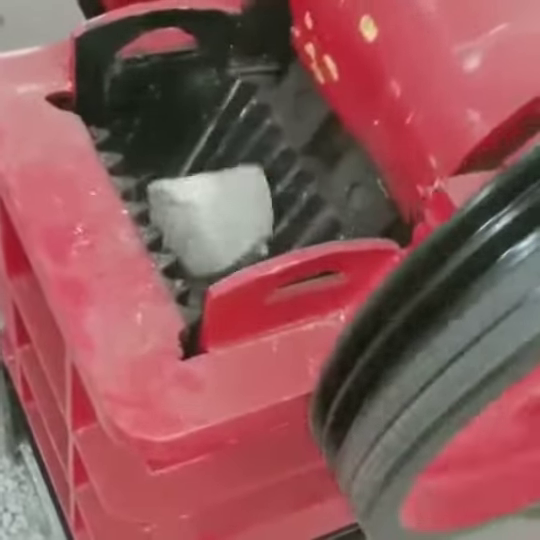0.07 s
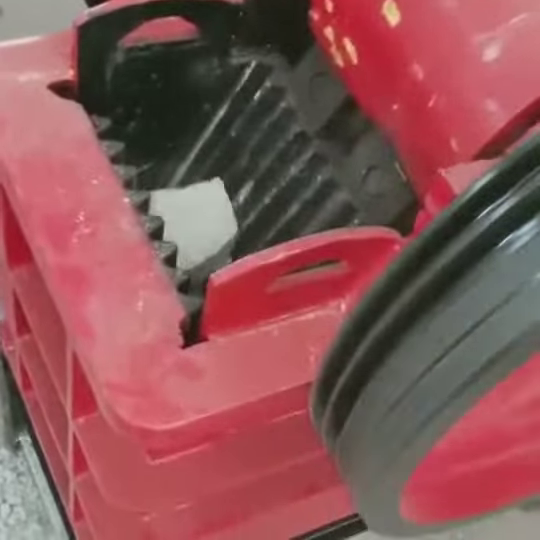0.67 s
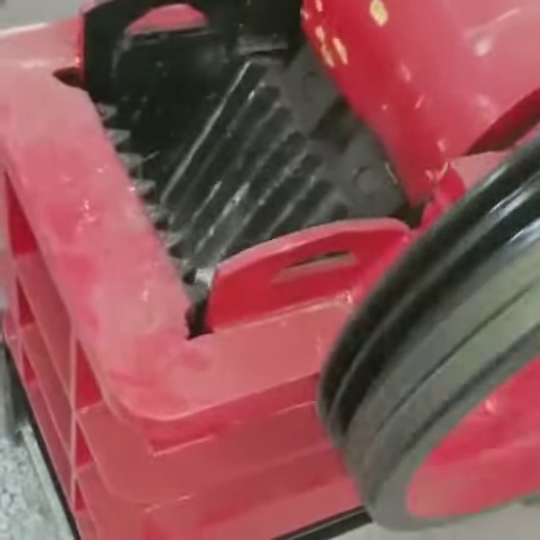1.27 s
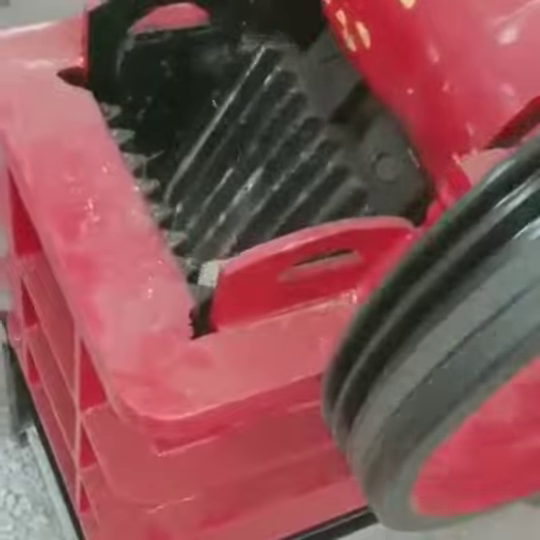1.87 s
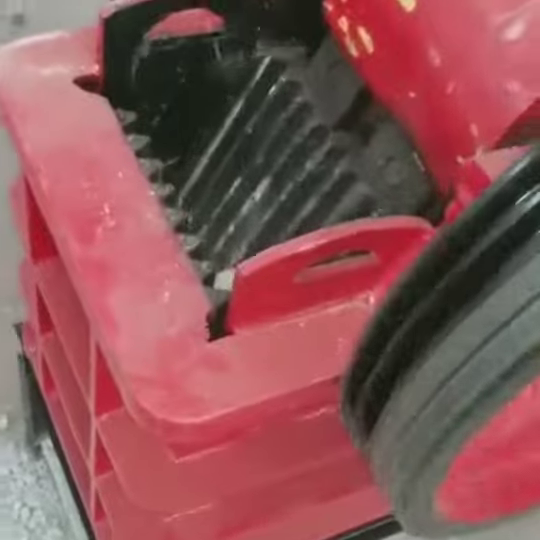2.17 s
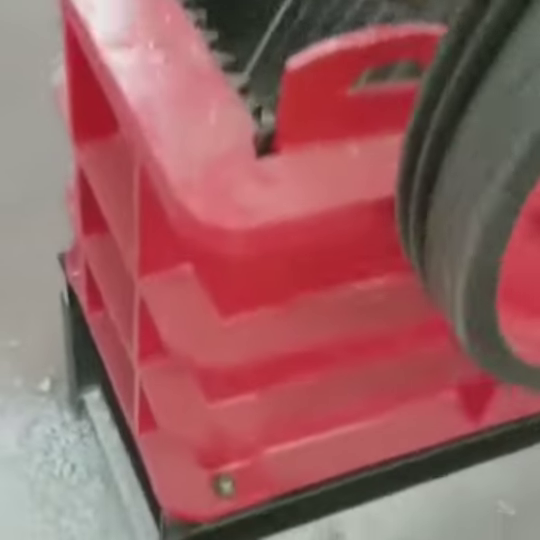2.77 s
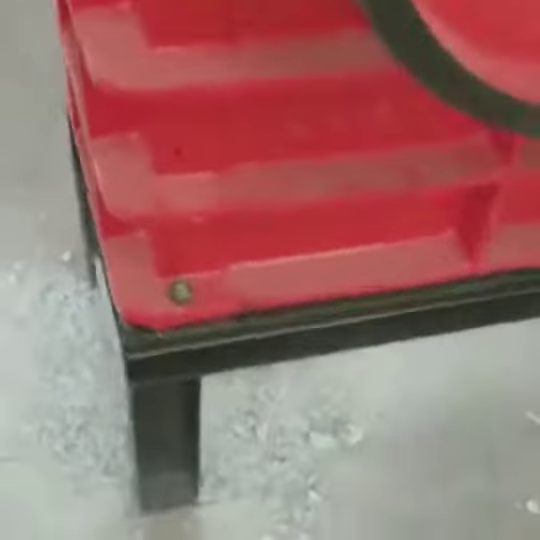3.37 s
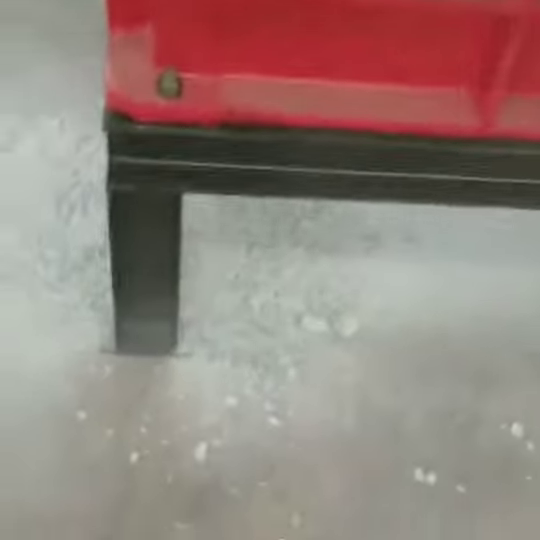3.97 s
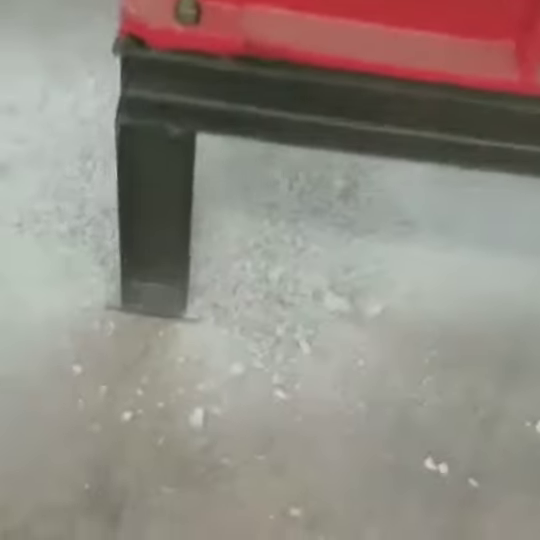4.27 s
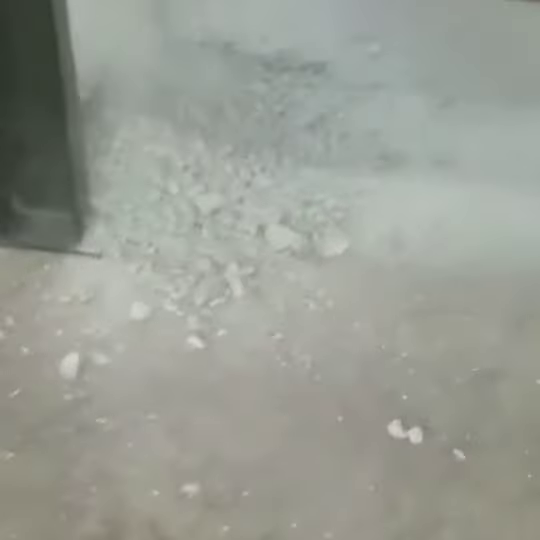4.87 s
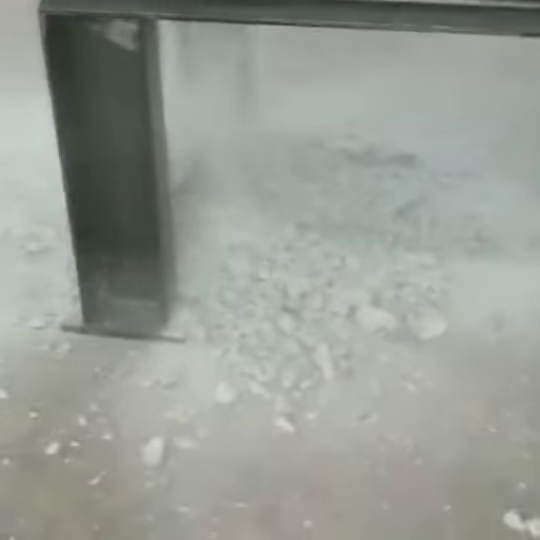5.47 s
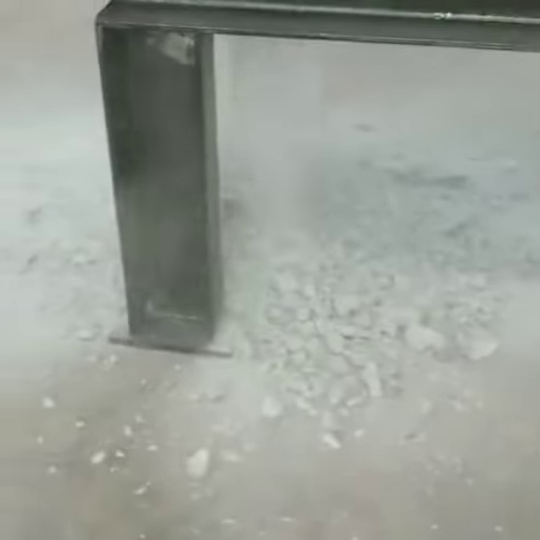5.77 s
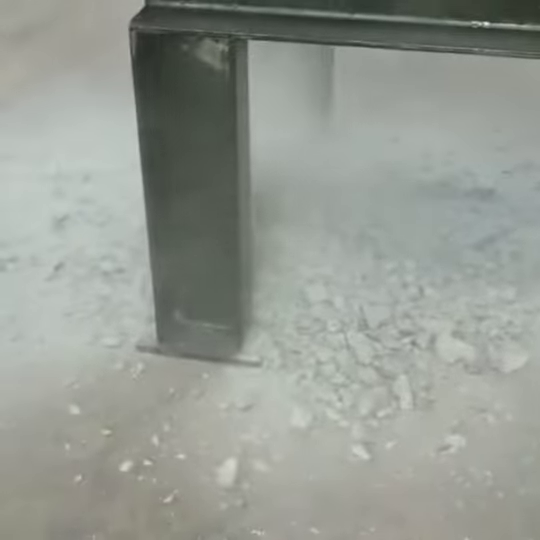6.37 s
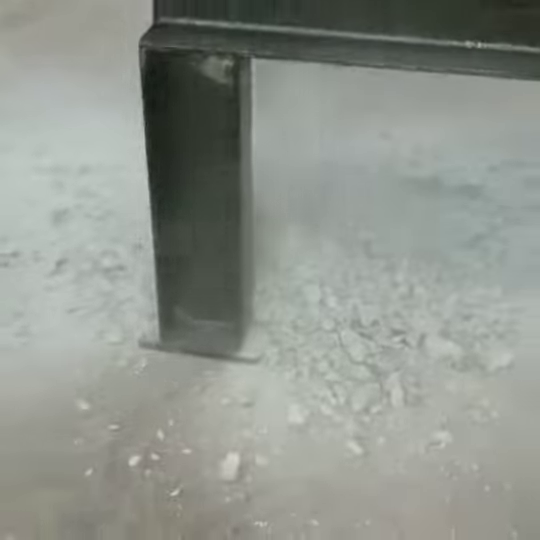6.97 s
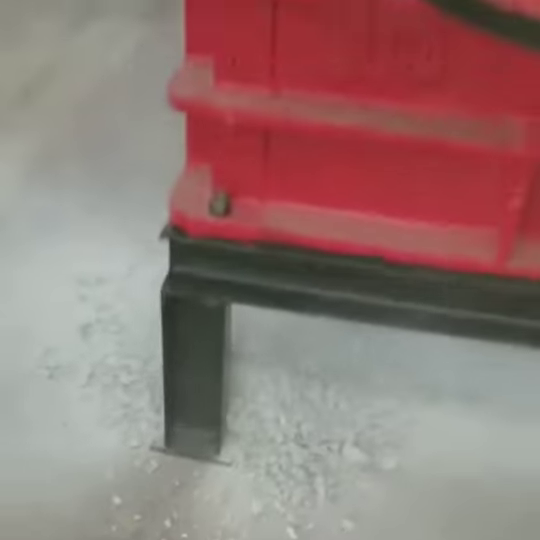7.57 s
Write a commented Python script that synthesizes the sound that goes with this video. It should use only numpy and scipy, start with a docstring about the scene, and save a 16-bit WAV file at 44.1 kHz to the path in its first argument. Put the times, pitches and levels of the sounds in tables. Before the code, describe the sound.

A small jaw crusher breaks stone for the whole seven and a half seconds, close by, in a workshop hall with a light echo. It crunches evenly about four times a second, each stroke a dense swarm of cracks that rings the steel frame. Between strokes, chips rattle down and the drive rumbles. For the first 2.5 seconds the sound comes from the mouth: lumps snap, knock on the teeth and make hollow booms, strongest around 0.4, 0.9 and 2.3 seconds. From about 2.5 to 5 seconds the microphone sinks toward the outlet, and the crunching turns brighter and more metallic as the booms thin out. Sharp cracks and plate clanks cluster around 3.2 to 4.4 seconds and again at 5.2 to 5.6. After slightly lighter crushing, more hard snaps and clanks come from 7 seconds, with the machine still running.

```python
"""Jaw crusher in a workshop hall.

A small crusher breaks stone at about 4.25 strokes/s. Each stroke is a swarm of cracks that rings the
steel frame. Big lumps snap, knock on the jaw teeth, clank on the plates and make the chamber boom.
Between strokes chips rattle down and the drive rumbles. The microphone sinks from mouth to outlet."""
import sys
import numpy as np
from scipy import signal
from scipy.fft import rfft, irfft, next_fast_len
from scipy.io import wavfile

SR = 44100
rng = np.random.default_rng(int(sys.argv[2]) if len(sys.argv) > 2 else 0)


def waveform_to_disk(signal):
    """Save audio, clipped to [-1, 1], as 16-bit WAV at the path in sys.argv[1]."""
    frames = np.transpose(np.atleast_2d(signal))
    scaled = np.clip(frames, -1, 1) * 32767
    samples = np.round(scaled).astype(np.int16)
    wavfile.write(sys.argv[1], SR, samples)


N = 336483
TIME_S = np.arange(N) / SR
STROKE_S, FIRST_CLOSED_S = 0.236, 0.19  # the eccentric shaft closes the jaw once a turn

# Jaw grips stone: grip_s, bite_db, crest_db, low_mid_db
JAW_STROKES = [(0.135, -20.5, -20.5, 0.5), (0.379, -24, -21, 3), (.595, -34, -22, 4), (0.83, -26, -21, -1),
               (1.07, -24.5, -23.5, 4), (1.323, -22.5, -20, -0.5), (1.548, -25, -21, 2.5),
               (1.77, -29.5, -21.5, 2.5), (2.009, -27.5, -20, -4.5), (2.256, -28, -22, 9),
               (2.484, -28, -19.5, -4.5), (2.725, -22, -22, -3.5), (2.979, -25.5, -21.5, -2.5),
               (3.195, -24.5, -22, -3), (3.439, -25, -20, 2), (3.669, -23, -20, -5), (3.9, -22, -16.5, -1),
               (4.139, -23.5, -19.5, 1), (4.366, -31, -21, 4.5), (4.624, -20, -21, 1.5),
               (4.836, -22.5, -22.5, -2), (5.082, -27.5, -22.5, 4), (5.31, -22, -20, -1.5),
               (5.545, -26, -19.5, 3), (5.781, -22, -18, -1), (6.022, -27, -19, 3), (6.273, -28.5, -22, -1),
               (6.496, -23.5, -19, -5), (6.733, -18.5, -18, -6.5), (6.969, -22, -18, 0),
               (7.21, -26, -17, 1.5), (7.439, -27, -21, 3.5)]
# Lump splits and crumbles: start_s, crumble_db, crack_db
LUMP_SPLITS = [(.215, -19, -4), (0.38, -10.5, -26), (.409, -18, -12), (0.458, -15, -13), (.68, -13, -13),
               (.894, -27, -7), (0.904, -18.5, -9), (0.912, -18.5, -1), (1.334, -29, -8),
               (1.369, -18.5, -9), (1.609, -12, -16), (1.859, -19, -12), (2.098, -14.5, -7),
               (2.272, -25, -2.5), (2.331, -16.5, -5), (2.484, -11.5, -17), (2.572, -22, 0.5),
               (3.192, -20, -13), (3.255, -13, -16), (3.691, -28, -12), (3.742, -11.5, -2),
               (3.899, -27.5, -1), (3.953, -17, -9), (3.985, -18, -7), (3.993, -12.5, -8),
               (4.204, -11, -20), (4.424, -26, 0), (4.435, -21, -9), (5.156, -10.5, -19), (5.181, -22, -12),
               (5.322, -20, -4), (5.384, -11, -9), (6.034, -17.5, -18.5), (6.322, -18, -17),
               (6.784, -29, -16), (6.918, -19.5, -18), (7.03, -31, -4), (7.235, -30, -17), (7.292, -10, -8),
               (7.46, -27, 0), (7.5, -22, -5)]
# Lump thumps the jaw plate; stone in the chamber shifts its pitch: start_s, boom_db, pitch_hz
JAW_THUMPS = [(0.209, -16.5, 332), (.4, -15.5, 373), (0.428, -16, 347), (0.449, -15, 324), (.655, -25, 326),
              (0.691, -14, 341), (.893, -17, 323.5), (.911, -9.5, 320), (1.211, -26, 332),
              (1.312, -25, 334), (1.387, -13, 322.5), (1.604, -17.5, 330), (1.862, -17, 322.4),
              (2.093, -17.5, 337), (2.286, -21, 328), (2.325, -11.5, 324), (2.487, -16.5, 322),
              (2.54, -17, 300), (2.753, -17, 295.5), (3.234, -14.5, 330), (3.439, -22, 346),
              (3.661, -21.5, 330), (3.947, -25, 340), (4.162, -20, 340), (4.413, -16, 322),
              (6.995, -26, 336), (7.033, -34, 334)]
# Stone strikes a steel plate: start_s, favoured_hz, level_db
PLATE_HITS = [(0.412, 1620, -4), (.458, 860, -12), (3.229, 236, -10.5), (3.25, 830, -9.5),
              (3.486, 828, -9.5), (3.7, 830, -11), (3.51, 234, -10.5), (3.935, 513, -24), (3.952, 598, -17),
              (3.976, 237, -5.5), (3.992, 1309, -1), (4.415, 252, -12), (5.152, 510, -13),
              (5.169, 1330, -13.5), (5.375, 510, -8.5), (5.605, 239.4, -7), (5.612, 1330, -14),
              (5.835, 510, -14), (6.082, 1330, -24), (6.737, 2100, -20), (7.237, 1247, -9.5),
              (7.275, 232, -1.5), (7.48, 1245, -17.5)]
# Hard lump knocks on the teeth: start_s, pitch_hz, level_db
TOOTH_HITS = [(0.159, 2800, -22), (0.211, 1600, -23), (0.423, 2740, -18), (.422, 4600, -17),
              (0.454, 1560, -18.5), (0.89, 2870, -27), (0.909, 3050, -19), (1.081, 2720, -20),
              (1.364, 1123, -15.5), (1.367, 3090, -22.5), (1.372, 5750, -22.5), (1.564, 2860, -21.5),
              (1.606, 1796, -18), (2.057, 2910, -21.5), (2.295, 676, -20), (2.306, 978, -14),
              (2.328, 1287, -15.5), (2.753, 3270, -16.5), (3.056, 2350, -21.5), (3.262, 984, -20.5),
              (3.495, 1780, -25), (3.494, 370, -23), (3.5, 1007, -20.5), (3.689, 4480, -16),
              (3.708, 3470, -20), (3.744, 4050, -18), (3.957, 3290, -11.5), (4.158, 3340, -14),
              (4.202, 1600, -19.5), (4.367, 4390, -25.5), (4.672, 3170, -18.5), (4.868, 4280, -20),
              (4.877, 1105, -16), (4.879, 2680, -21), (5.152, 1154, -17), (5.175, 2305, -18),
              (5.324, 3240, -17), (5.385, 2830, -22.5), (5.385, 440, -14.5), (5.822, 1116, -22),
              (5.821, 4280, -22), (6.029, 1113, -22.5), (6.049, 3490, -17), (6.079, 1107, -18),
              (6.098, 1430, -23), (6.308, 1216, -22), (6.322, 2450, -29), (6.596, 3490, -23),
              (6.779, 1123, -16), (6.779, 4220, -25), (7.065, 2600, -21), (7.269, 2860, -18),
              (7.289, 1284, -14.5), (7.292, 3440, -13.5), (7.459, 1240, -18)]
# Drive and chips under the strokes: time_s, rumble_db, chips_db
IDLE_LEVELS = [(0.0, -25.5, -26), (0.25, -29.5, -33), (0.58, -30, -30.5), (0.78, -31, -32),
               (2.34, -31, -35), (3.27, -34.5, -31.5), (3.59, -30, -30), (3.89, -28, -28),
               (4.99, -36, -35.5), (5.33, -32.5, -30), (5.8, -32.5, -32), (6.63, -38, -34),
               (7.33, -31.5, -27.5), (7.63, -29, -27)]
# Microphone path: time_s, outlet_share (0 mouth, 1 outlet)
MIC_PATH = [(0, 0), (2.3, 0.1), (2.9, 0.54), (3.8, 0.64), (4.8, 0.96), (6.3, 0.91), (7.63, 0.85)]

# Crushing heard at the mouth: freq_hz, density_db
MOUTH_SPECTRUM = [(40, -32), (70, -20.5), (110, -30), (160, 1), (230, 6), (450, 4), (650, 6.5), (900, 7),
                  (1400, -0.5), (2200, -5.5), (3800, -2), (5000, -8), (7800, -13), (9500, -25.5)]
# Crushing heard at the outlet: freq_hz, density_db
OUTLET_SPECTRUM = [(40, -25), (70, -6), (110, -7), (160, -19.5), (240, 5.5), (350, 1.5), (600, 1),
                   (1200, 7.5), (1800, 8.5), (3300, 0), (4800, 1.5), (7800, -8.5), (9500, -28.5)]
# Drive rumble: freq_hz, density_db
RUMBLE_SPECTRUM = [(25, -47), (45, -7), (70, 2.5), (120, -1.5), (170, 7), (250, 5.5), (420, 2.5), (600, -1),
                   (900, 0), (1300, -4), (2500, -48.5)]
# Trickling chips: freq_hz, density_db
CHIP_SPECTRUM = [(300, -17), (700, 21), (1100, 16.5), (2000, 17.5), (3300, 11), (5000, 11.5), (7800, 2),
                 (9500, -32)]
# Ring of pinched lumps and shards: pitch_hz, level_db
STONE_RING = [(1100, -9), (1600, -3.5), (2400, -0.5), (3500, 0), (4500, -3.5), (6600, -5.5)]
# Steel frame: pitch_hz, width_hz, mouth_db, outlet_db
FRAME_MODES = [(171.8, 11, -23.5, -11), (236, 78, -14.5, -7.5), (325, 15.3, -4.5, -16),
               (516, 23, -35, -13.5), (595, 21, -12, -9), (836.5, 33, -10.5, -7), (1260, 20, -27, -13.5),
               (1338.3, 11.7, -15.5, -6.5), (1544, 21, -16.5, -10.5), (2130, 22, -26.5, -10),
               (2875, 49, -17, -8.5), (3407, 49, -31, -12.5), (3626, 20, -26, -8.5), (4380, 56, -19, -18),
               (5130, 45, -29.5, -28.5), (5700, 43, -18, -18.5), (7210, 53, -28, -10.5),
               (7620, 130, -18.5, -13.5)]
# Jaw chamber: pitch_hz, t60_s, mouth_db, outlet_db
CHAMBER_MODES = [(158, 0.12, -17.5, -20), (227.5, 0.25, -18, 9), (329, 0.13, 6, -13.5), (383, 0.06, 0, -12),
                 (483, 0.025, -41.5, 18), (605, 0.12, -9.5, -14), (754, 0.045, -7, -11.5),
                 (875, 0.062, -26, 0.5)]
# Jolt of a splitting lump: pitch_hz, width_hz, level_db
JOLT_MODES = [(520, 380, -9), (1300, 900, -3), (3100, 1500, -9)]
# Left-right likeness: freq_hz, correlation
EAR_CORRELATION = [(60, 1), (170, 1), (350, 0.87), (700, 0.43), (1300, 0), (3000, 0.43), (8000, 0)]
# Stereo balance: freq_hz, left_over_right_db
EAR_BALANCE = [(40, 9), (90, -2.5), (180, 1), (330, 4.5), (700, 2.5), (1400, 3.5), (2800, 0), (5500, 1.5),
               (8500, 6.5)]
# Hall reverberation: freq_hz, t60_s
HALL_DECAY = [(100, 0.2), (500, 0.99), (2000, 0.9), (8000, 0.27)]


def crushing(outlet):
    """Stone cracks under the jaw force, in a dense burst where a lump splits; frame and lumps ring."""
    start_s, crumble_db, crack_db = np.transpose(LUMP_SPLITS)
    force = jaw_force() * from_db(drift(corner_hz=24))
    crumbling = bursts(start_s, crumble_db, decay_s=0.018)
    cracking = bursts(start_s, crack_db, decay_s=0.00018)
    drive = cracks(per_s=7000, spread_db=1) * force
    drive += from_db(-5.5) * cracks(per_s=9000, spread_db=2.5) * (crumbling + cracking)
    closed_s = FIRST_CLOSED_S + np.arange(len(JAW_STROKES)) * STROKE_S
    low_mid_db = np.interp(TIME_S, closed_s, [row[3] for row in JAW_STROKES]) + 8.2 * outlet + 3
    stone = colour(drive, MOUTH_SPECTRUM, OUTLET_SPECTRUM, outlet, low_mid_db,
                   norm_above_hz=900, flicker_db=6)
    clinks = shards(force + crumbling, spread_db=3.5, count=3000, cycles=22)
    return (from_db(-6) * stone + from_db(-6.5) * frame(drive, outlet)
            + from_db(-2) * clinks + from_db(-1.5) * pinched_lumps(drive))


def jaw_force(bite_s=0.017, crest_lead_s=0.026, release_db_per_s=230):
    """The jaw bites, loads the stone to a crest just before closing, then lets go."""
    force = np.zeros(N)
    for turn, (grip_s, bite_db, crest_db, _) in enumerate(JAW_STROKES):
        closed_s = FIRST_CLOSED_S + turn * STROKE_S
        span = slice(*np.searchsorted(TIME_S, [grip_s - bite_s, grip_s + STROKE_S]))
        contact = np.interp(TIME_S[span], [grip_s - bite_s, grip_s], [0, 1])
        load_db = np.interp(TIME_S[span], [grip_s, closed_s - crest_lead_s], [bite_db, crest_db])
        release_db = release_db_per_s * np.maximum(TIME_S[span] - closed_s, 0)
        force[span] += contact * from_db(load_db - release_db)
    return force


def cracks(per_s, spread_db):
    """Random clicks, mostly small, each reaching 2 x 2 paths at separate strengths; rms 1."""
    sizes = (rng.random(N) < per_s / SR) * from_db(spread_db * np.minimum(rng.exponential(1, N), 4))
    return unit_rms(sizes * rng.standard_normal((2, 2, N)))


def frame(drive, outlet, count=len(FRAME_MODES)):
    """The lowest count steel modes ring, weighted by listening position."""
    out = 0
    for k, (hz, width_hz, mouth_db, outlet_db) in enumerate(FRAME_MODES[:count]):
        mode = ring(drive[k % 2], hz, width_hz) * np.sqrt(4 * np.pi * width_hz / SR)
        out += stereo(mode, hz) * (from_db(mouth_db) * (1 - outlet) + from_db(outlet_db) * outlet)
    return out


def pinched_lumps(drive, low_hz=1150, high_hz=7400, min_width_hz=45, max_q=65, count=12):
    """Each stroke pinches new lumps, which ring at their own pitches until the next."""
    edges = [0] + [int(row[0] * SR) - SR // 50 for row in JAW_STROKES[1:]] + [N]
    out = np.zeros((2, N))
    for start, end in zip(edges, edges[1:]):
        samples = np.arange(end - start)
        steps = (np.arange(count) + rng.random(count)) / count
        lag_cycles = rng.random((count, 2))  # unequal paths to the ears
        for k, hz in enumerate(low_hz * (high_hz / low_hz) ** steps):
            width_hz = max(min_width_hz, hz / max_q)
            mode = ring(drive[k % 2, k // 2 % 2, start:end], hz, width_hz)
            mode *= from_db(at_hz(STONE_RING, hz)) * np.sqrt(4 * np.pi * width_hz / SR / count)
            ears = [np.interp(samples - lag * SR / hz, samples, mode) for lag in lag_cycles[k]]
            out[:, start:end] += ear_gains(hz) * ears
    return out


def shards(envelope, spread_db, count, cycles, rise_s=0.0074, max_decay_s=0.007):
    """Splinters clink briefly at random pitches, as loud as the moment that frees them."""
    draws = rng.random((count, 6))
    age_s = np.arange(1400) / SR
    starts = (draws[:, 0] * N).astype(int)
    low_hz, high_hz = STONE_RING[0][0], STONE_RING[-1][0]
    pitch_hz = low_hz * (high_hz / low_hz) ** draws[:, 1]
    sizes = from_db(at_hz(STONE_RING, pitch_hz) + spread_db * np.minimum(-np.log(1 - draws[:, 2]), 3))
    decay_s = np.minimum(cycles / pitch_hz * (0.5 + draws[:, 3]), max_decay_s)
    sizes *= envelope[starts] / np.sqrt(np.sum(sizes ** 2 * decay_s) * SR / (4 * N))
    ear_phases = draws[:, 4:, None]  # bounces between the plates shift the phase at each ear
    swell = 1 - np.exp(-age_s / rise_s)
    out = np.zeros((2, N + len(age_s)))
    for at, hz, size, tau_s, phase in zip(starts, pitch_hz, sizes, decay_s, ear_phases):
        wave = np.sin(2 * np.pi * (hz * age_s + phase))
        out[:, at:at + len(age_s)] += size * ear_gains(hz) * swell * np.exp(-age_s / tau_s) * wave
    return out[:, :N]


def fractures():
    """A splitting lump unloads the jaw at once: one hard jolt, unequal at the two ears."""
    start_s, _, crack_db = np.transpose(LUMP_SPLITS)
    scatter_db = rng.normal(0, 2.5, (len(LUMP_SPLITS), len(JOLT_MODES), 2))
    out = 0
    for k, (hz, width_hz, level_db) in enumerate(JOLT_MODES):
        jolts = np.zeros((2, N))
        jolts[:, (start_s * SR).astype(int)] = from_db(crack_db + level_db + scatter_db[:, k].T)
        out += (-1) ** k * radiated(ring(jolts, hz, width_hz), hz) * ear_gains(hz)
    return butter(out, 1, 5000)


def chamber_booms(outlet, contact_hz=900, nominal_hz=330):
    """Soft, heavy blows ring the jaw chamber; each weights the modes anew."""
    age_s = np.arange(SR // 4) / SR
    scatters_db = rng.normal(0, 0.63, (len(JAW_THUMPS), len(CHAMBER_MODES)))
    out = np.zeros((2, N + len(age_s)))
    for (start_s, boom_db, pitch_hz), scatter_db in zip(JAW_THUMPS, scatters_db):
        at = int(start_s * SR)
        for k, (hz, t60_s, mouth_db, outlet_db) in enumerate(CHAMBER_MODES):
            mode = np.cos(2 * np.pi * hz * pitch_hz / nominal_hz * age_s) * from_db(-60 * age_s / t60_s)
            level_db = boom_db + mouth_db + (outlet_db - mouth_db) * outlet[at] + scatter_db[k]
            out[:, at:at + len(age_s)] += (-1) ** k * mode * from_db(level_db) * ear_gains(hz)
    return from_db(-2.5) * butter(out[:, :N], 2, contact_hz)


def plate_clanks(reach_octaves=0.022, floor_db=-24):
    """A blow rings all frame modes faintly, those near the struck spot's favoured pitch strongly."""
    start_s, favoured_hz, blow_db = np.transpose(PLATE_HITS)
    angles_rad = rng.standard_normal((len(PLATE_HITS), len(FRAME_MODES)))
    out = 0
    for k, (hz, width_hz, *_) in enumerate(FRAME_MODES):
        favour = np.exp(-(np.log2(hz / favoured_hz) / reach_octaves) ** 2) + from_db(floor_db)
        mid_side = [np.cos(angles_rad[:, k]), np.sin(angles_rad[:, k])]
        blows = np.zeros((2, N))
        blows[:, (start_s * SR).astype(int)] = from_db(blow_db) * favour * mid_side
        out += (-1) ** k * stereo(radiated(ring(blows, hz, width_hz), hz), hz)
    return from_db(4.5) * butter(out, 1, 5000)


def tooth_knocks(span_octaves=0.75, rise_s=0.00033, decay_s=0.019, crack_s=0.0017, count=6):
    """A lump hits the teeth: a sharp crack, then a few close, short-lived modes of the lump."""
    age_s = np.arange(SR // 10) / SR
    envelope = (1 - np.exp(-age_s / rise_s)) * np.exp(-age_s / decay_s)
    out = np.zeros((2, N + len(age_s)))
    all_draws = rng.random((len(TOOTH_HITS), 3, count, 1))
    for (start_s, pitch_hz, level_db), draws in zip(TOOTH_HITS, all_draws):
        steps = (np.arange(count)[:, None] + draws[0]) / count - 0.5
        modes_hz = pitch_hz * 2 ** (span_octaves * steps)
        modes = np.cos(np.pi * steps) * np.sin(2 * np.pi * (modes_hz * age_s + draws[1:]))
        noise = butter(rng.standard_normal((2, len(age_s))), 1, [pitch_hz / 2, pitch_hz * 2], "band")
        crack = from_db(-1) * unit_rms(noise) * np.exp(-age_s / crack_s)
        knock = envelope * unit_rms(modes.sum(axis=1)) + crack
        at = int(start_s * SR)
        out[:, at:at + len(age_s)] += knock * from_db(level_db) * ear_gains(pitch_hz)
    return from_db(-1) * out[:, :N]


def falling_chips(level_db, lag_s=0.13, swing_db=0.5):
    """Chips trickle onto the heap, most freely lag_s after closing, when the jaw stands open."""
    opening = np.cos(2 * np.pi * (TIME_S - FIRST_CLOSED_S - lag_s) / STROKE_S)
    flow = from_db(level_db + swing_db * opening + 0.8 * drift(corner_hz=17))
    grit = colour(cracks(per_s=2600, spread_db=0), CHIP_SPECTRUM, flicker_db=7)
    pebbles = shards(flow, spread_db=2.6, count=4400, cycles=20)
    return from_db(-6) * flow * grit + from_db(2.4) * pebbles


def drive_rumble(level_db, outlet):
    """The drive rumbles and shakes the frame; the deepest part is heard only under the machine."""
    shake = rng.standard_normal((2, 2, N))
    full = colour(shake, RUMBLE_SPECTRUM)
    thin = butter(full, 1, 150, "high")
    rumble = thin + outlet ** 4 * (full - thin)
    drone = frame(butter(shake[::-1], 2, 900), outlet, count=8)
    return from_db(level_db + 0.5 + 1.6 * drift(corner_hz=35)) * (rumble + drone)


def hall(x, count=10):
    """Feedback echoes between the walls, separate for each ear, dying sooner in the treble."""
    size = next_fast_len(N + SR)
    hz = np.arange(size // 2 + 1) * SR / size
    t60_s = at_hz(HALL_DECAY, hz + 1)
    out = []
    for channel in x:
        response = 0
        for k, lag_s in enumerate(rng.uniform(0.018, 0.07, count)):
            loop = np.exp(-lag_s * (np.log(1000) / t60_s + 2j * np.pi * hz))
            response += (-1) ** k * loop / (1 - loop)
        out.append(irfft(rfft(channel, size) * response, size)[:N] / np.sqrt(count))
    return np.array(out)


def colour(drive, spectrum, other=None, share=0, low_mid_db=0, norm_above_hz=0, flicker_db=0):
    """Half-octave stereo bands, blended by share from one power-normalised spectrum to the other."""
    edges_hz = 25 * 2 ** (np.arange(19) / 2)
    centres_hz = np.sqrt(edges_hz[1:] * edges_hz[:-1])
    counted_hz = np.diff(edges_hz) * (centres_hz > norm_above_hz)
    gains = [from_db(at_hz(points, centres_hz)) for points in (spectrum, other or spectrum)]
    first, second = [g / np.sqrt(np.sum(g ** 2 * counted_hz) * 2 / SR) for g in gains]
    boost = from_db(low_mid_db) - 1
    out = 0
    for k, hz in enumerate(centres_hz):
        band = butter(drive[k % 2] + 1e-18, 2, edges_hz[k:k + 2], "band")
        gain = first[k] + share * (second[k] - first[k])
        gain *= 1 + boost / (1 + (hz / 850) ** 4 + (170 / hz) ** 4)
        if flicker_db:
            gain *= from_db(flicker_db * np.tanh(drift(corner_hz=12)))
        out += gain * stereo(band, hz)
    return out


def bursts(start_s, level_db, decay_s):
    """Envelope that jumps at each event and decays."""
    hits = np.zeros(N)
    hits[(start_s * SR).astype(int)] = from_db(level_db)
    return signal.lfilter([1], [1, -np.exp(-1 / (decay_s * SR))], hits + 1e-18)


def ring(x, hz, width_hz):
    """Resonator: a unit click starts a decaying sine of height 1."""
    r, w = np.exp(-np.pi * width_hz / SR), 2 * np.pi * hz / SR
    return signal.lfilter([0, np.sin(w)], [1, -2 * r * np.cos(w), r * r], x + 1e-18)


def radiated(x, hz):
    """Plates radiate their velocity, so little sounds far below a mode; gain 1 at hz."""
    return np.diff(x, prepend=0) * SR / (2 * np.pi * hz)


def stereo(pair, hz):
    """Two unrelated signals as mid and side: left and right are most alike in the bass."""
    alike = at_hz(EAR_CORRELATION, hz)
    mid, side = np.sqrt((1 + alike) / 2) * pair[0], np.sqrt((1 - alike) / 2) * pair[1]
    return np.array([mid + side, mid - side]) * ear_gains(hz)


def ear_gains(hz):
    return from_db(at_hz(EAR_BALANCE, hz) * np.array([[0.5], [-0.5]]))


def drift(corner_hz, hop=40, settle=2000):
    """Slow random wander, rms 1."""
    r = np.exp(-2 * np.pi * corner_hz * hop / SR)
    slow = signal.lfilter([1], [1, -2 * r, r * r], rng.standard_normal(N // hop + settle + 2))[settle:]
    return np.interp(np.arange(N) / hop, np.arange(len(slow)), unit_rms(slow))


def butter(x, order, hz, kind="low"):
    return signal.sosfilt(signal.butter(order, hz, kind, fs=SR, output="sos"), x)


def from_db(db):
    return 10 ** (np.asarray(db) / 20)


def unit_rms(x):
    return x / np.sqrt(np.mean(x ** 2) + 1e-20)


def in_time(rows):
    time_s, *columns = np.transpose(rows)
    return [np.interp(TIME_S, time_s, column) for column in columns]


def at_hz(points, hz):
    freq_hz, values = np.transpose(points)
    return np.interp(np.log(hz), np.log(freq_hz), values)


def scene():
    """Breaking stone and its hall echo over the drive and chips."""
    outlet, = in_time(MIC_PATH)
    rumble_db, chips_db = in_time(IDLE_LEVELS)
    crusher = crushing(outlet) + fractures() + chamber_booms(outlet) + plate_clanks() + tooth_knocks()
    echo = from_db(-13) * hall(crusher)
    return crusher + echo + drive_rumble(rumble_db, outlet) + falling_chips(chips_db)


def record(dry):
    """The microphone drops the deep bass; the top steps down, then is cut. Loud peaks are rounded so they stay
    in range."""
    low_cut_hz, step_hz, cutoff_hz, ceiling = 106, 8200, 9550, 0.82
    thin = butter(dry, 2, low_cut_hz, "high")
    rounded = thin / (1 + (thin / ceiling) ** 6) ** (1 / 6)
    body = signal.sosfilt(signal.ellip(7, 0.2, 50, step_hz, fs=SR, output="sos"), rounded)
    top = from_db(-9) * butter(rounded, 8, 8500, "high")
    return signal.sosfilt(signal.ellip(10, 0.2, 90, cutoff_hz, fs=SR, output="sos"), body + top)


dry = scene()
out = record(dry)
waveform_to_disk(out)
```